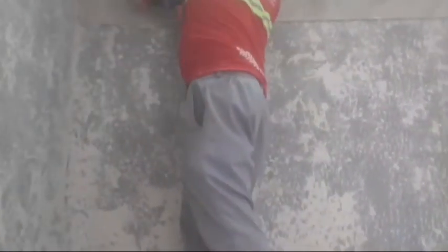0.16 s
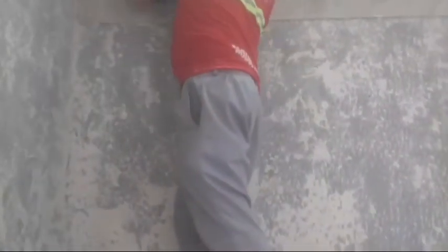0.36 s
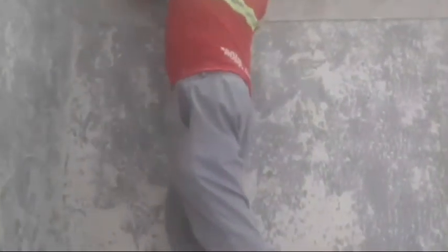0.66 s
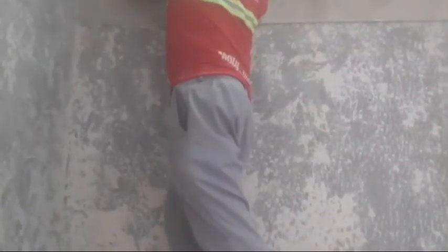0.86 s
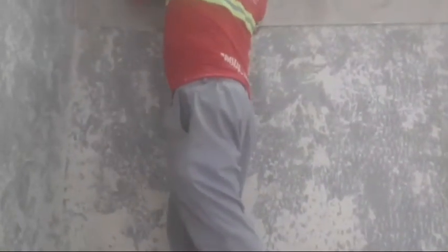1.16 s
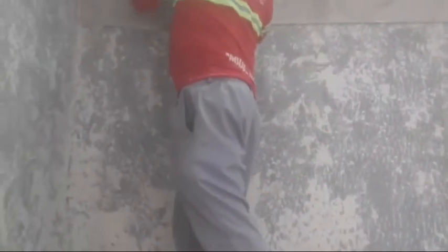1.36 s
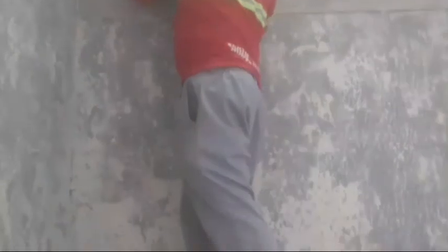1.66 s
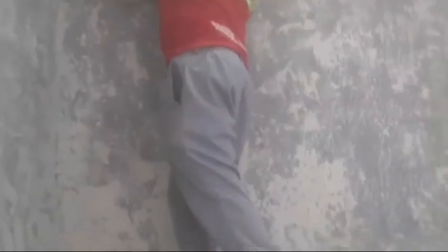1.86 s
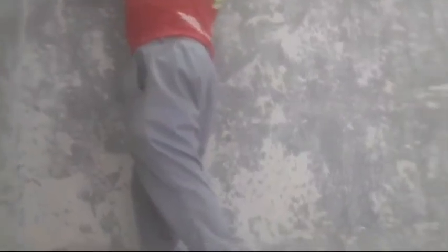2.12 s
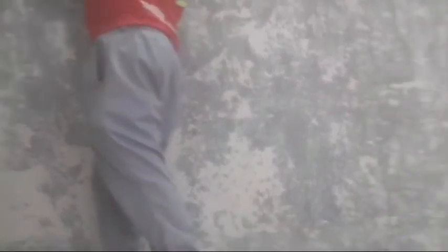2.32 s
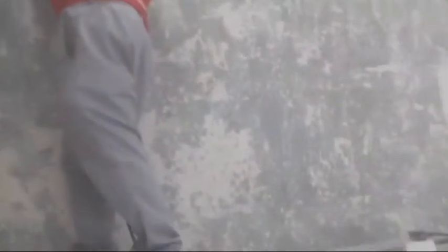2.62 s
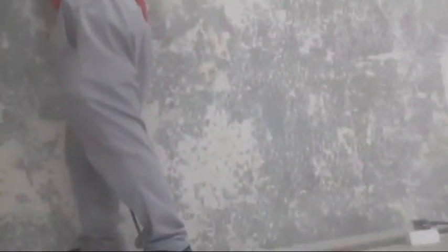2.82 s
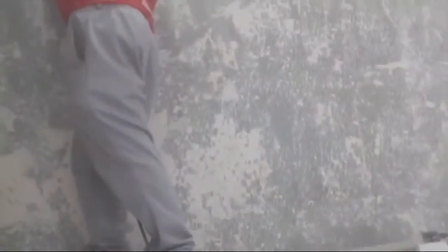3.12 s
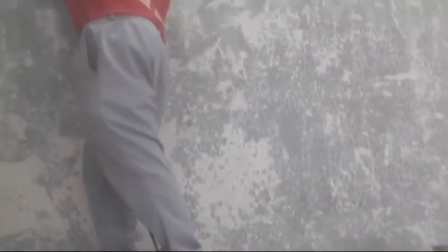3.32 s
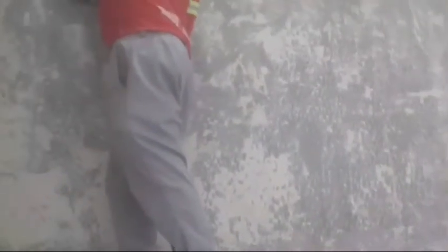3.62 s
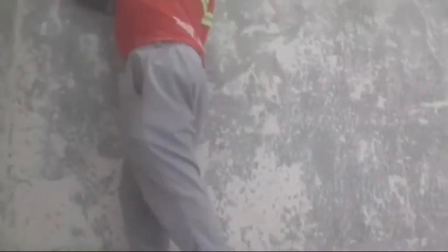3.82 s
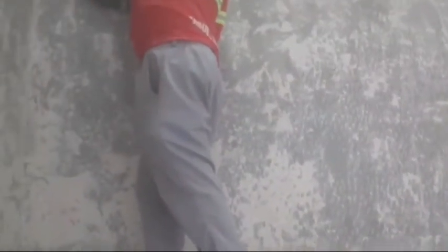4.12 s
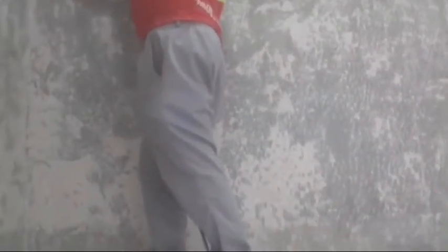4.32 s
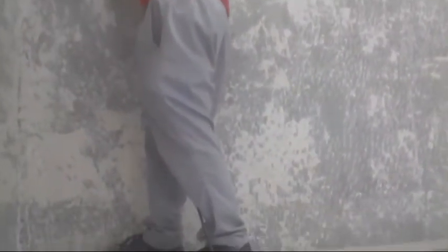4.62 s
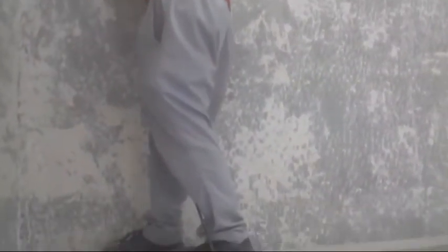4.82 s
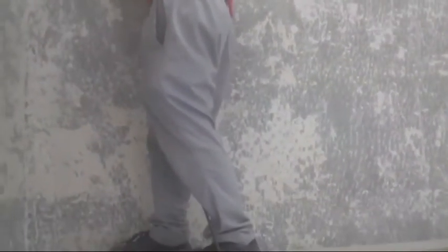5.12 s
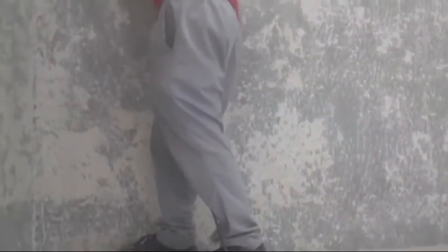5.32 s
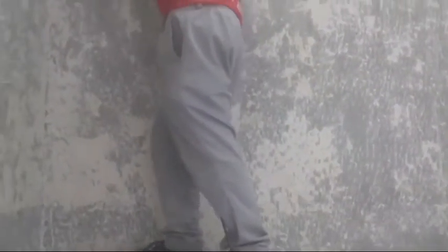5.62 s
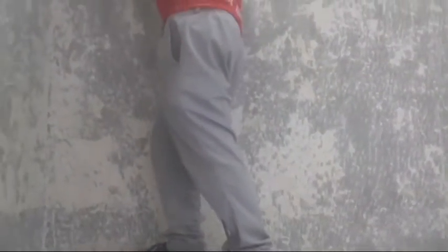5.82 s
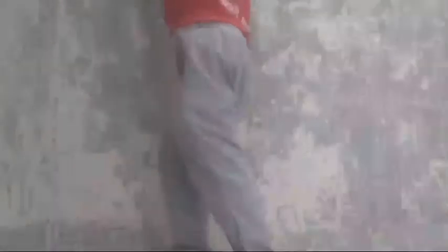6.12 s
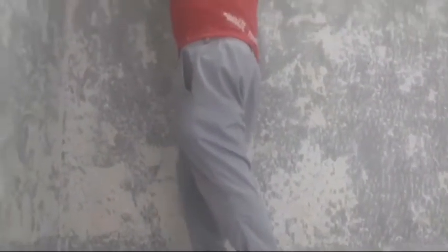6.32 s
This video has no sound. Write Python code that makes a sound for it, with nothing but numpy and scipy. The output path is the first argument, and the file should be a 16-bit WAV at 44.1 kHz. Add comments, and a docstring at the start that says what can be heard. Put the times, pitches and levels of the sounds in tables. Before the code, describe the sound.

At the start, the motor of an electric chipping hammer is coasting down with a rattle in a bare, echoing room. At about 0.6 seconds the trigger clicks, the motor whines up and the chisel pounds the wall in a loud, very fast buzz, cracking tile near 1 second. It cuts off at about 1.2 seconds, and the gears rattle and fall in pitch as they slow. Soft knocks come around 2.4 seconds. From 3 to 4.5 seconds, shoes scuff quietly on grit and a loose slab gives a few short, hollow scrapes. A sharp, bright clink with quick bounces comes at 4.6 seconds, a piece of tile drops and rings at 4.8, and a knock follows at 5.1. At 5.8 seconds the hammer starts again and chisels until the end, near 6.5 seconds. Distant machines hum faintly underneath.

```python
"""A bare, echoing room on a building site: an electric chipping hammer breaks tiles off the wall.
Its motor is coasting down at the start, then runs in two short bursts: it whines up, the chisel
strikes some 70 to 80 times a second, and the gears rattle as they slow. One crank times both
the blows and the rattle. In the pause the worker shifts his feet, a loose slab scrapes,
hard pieces and the tool clink, and a piece of tile drops. Distant machines hum underneath."""
import sys
import numpy as np
from scipy import signal
from scipy.fft import rfft, irfft
from scipy.io import wavfile
from scipy.ndimage import uniform_filter1d, minimum_filter1d

SR = 44100
rng = np.random.default_rng(int(sys.argv[2]) if len(sys.argv) > 2 else 0)


def dump(signal):
    """Clip the signal to [-1, 1] and save it as 16-bit WAV at the path in sys.argv[1]."""
    limited = np.clip(np.atleast_2d(signal).T, -1, 1)
    pcm = np.round(limited * 32767).astype(np.int16)
    wavfile.write(sys.argv[1], SR, pcm)


N = 285327
TIME = np.arange(N) / SR


def from_db(db):
    """Decibels to gain."""
    return 10 ** (np.asarray(db) / 20)


def rms_one(x):
    """Scale to rms 1."""
    return x / np.sqrt(np.mean(x ** 2) + 1e-20)


def energy_one(x):
    """Scale to energy 1."""
    return x / np.sqrt(np.sum(x ** 2) + 1e-20)


def at_hz(points, hz):
    """Read a table on a log-frequency axis."""
    f, value = np.transpose(points)
    return np.interp(np.log(np.maximum(hz, 1)), np.log(f), value)


def drift(rate_hz):
    """Random wander: straight lines between unit normal draws."""
    return np.interp(TIME * rate_hz, np.arange(N), rng.standard_normal(N))


def through(x, response):
    """Pass a sound through an impulse response."""
    return signal.fftconvolve(x, response)[:N]


def body(spectrum, bass_db=0, treble_db=0, size=4096):
    """Minimum-phase response of a heavily damped body with this spectrum; energy 1."""
    hz = np.arange(size // 2 + 1) * SR / size
    tilt_db = at_hz([(400, bass_db), (1500, 0), (2300, 0), (7000, treble_db)], hz)
    cepstrum = irfft(np.log(from_db(at_hz(spectrum, hz) + tilt_db)))
    cepstrum[1:size // 2] *= 2
    cepstrum[size // 2 + 1:] = 0
    return energy_one(irfft(np.exp(rfft(cepstrum))))


def ringing(modes, pitch=1):
    """Response of a struck object: decaying sines; energy 1."""
    t = TIME[:SR // 2]
    return energy_one(sum(from_db(db - 60 * t / t60_s) * np.sin(2 * np.pi * hz * pitch * t)
                          for hz, db, t60_s in modes))


def placed(start_s, db, sound):
    """Place a sound of energy 1; db is its level if spread over 0.1 s."""
    return from_db(db) * np.sqrt(SR / 10) * np.pad(sound, (max(round(start_s * SR), 0), N))[:N]


# Room decay. Each row: frequency in Hz, T60 in seconds.
ROOM_DECAY = [(100, 0.56), (500, 0.69), (2000, 0.37), (4000, 0.61), (8000, 0.44), (15000, .45)]
# First reflections. Each row: delay in seconds, level in dB re the direct sound.
WALL_ECHOES = [(.0078, -5), (0.0173, -13), (.0245, -16), (.0335, -12)]

def room(x, direct_db, build_s=0.0063, scatter_s=0.001):
    """Direct sound, reflections scattered by rough walls, and a dense tail decaying band by band."""
    t = TIME[:SR]
    white, hz = rfft(rng.standard_normal(SR)), np.arange(SR // 2 + 1)
    centres_hz = np.geomspace(100, 15000, 9)
    tail = 0
    for centre_hz, share in zip(centres_hz, np.eye(len(centres_hz))):
        band = irfft(white * at_hz(list(zip(centres_hz, share)), hz), SR)
        tail = tail + band * from_db(-60 * t / at_hz(ROOM_DECAY, centre_hz))
    tail = energy_one(tail * (1 - np.exp(-t / build_s)))
    early = signal.unit_impulse(SR)
    for delay_s, db in WALL_ECHOES:
        scattered = energy_one(rng.standard_normal(SR) * np.exp(-t / scatter_s))
        early = early + from_db(db) * np.roll(scattered, round(delay_s * SR))
    return through(x, energy_one(tail + from_db(direct_db) * early))


# Distant site noise. Each row: frequency in Hz, spectral density in dB.
WASH_SPECTRUM = [(25, -19.5), (60, -14.5), (88, -11.5), (115, 0), (175, 0.5), (230, -3), (310, 5.5),
                 (420, 0.5), (570, 1.5), (750, -1), (1300, -2.5), (2050, -6), (3300, -16), (4100, -11),
                 (5500, -41), (7000, -34), (15500, -41)]
# Machine tones. Each row: frequency in Hz, level in dB re the wash.
MACHINE_TONES = [(174, -15), (748, -13), (1674, -25), (2019, -13.5), (2885, -22), (4215, -24.5)]
# Background level: the recorder's gain ducks after loud sounds, then slowly recovers.
# Each row: time in seconds, level in dB.
BACKGROUND_LEVEL = [(0, -55), (2.2, -57.5), (2.8, -48.5), (3.6, -47), (4.5, -48), (4.75, -50), (5.3, -49.5),
                    (5.6, -55.5), (6.47, -48.5)]

def site():
    """The dull wash of the site and the hum of distant machines, under one preset gain curve."""
    level_db = np.interp(TIME, *np.transpose(BACKGROUND_LEVEL))
    wash = through(rng.standard_normal(N), body(WASH_SPECTRUM))
    hum = 0
    for hz, db in MACHINE_TONES:
        amplitude = np.sqrt(2) * from_db(db + 2 * drift(3.8))
        hum = hum + amplitude * np.sin(2 * np.pi * hz * TIME + 0.78 * drift(11))
    return from_db(level_db) * (wash + hum)


# Microphone bump. Each row: start in seconds, level in dB.
MIC_BUMPS = [(4.216, -56)]

def bump():
    """A soft bump on the microphone rings two low modes."""
    thud = ringing([(75, -10, .04), (138, -1, .03)])
    return sum(placed(s, db, thud) for s, db in MIC_BUMPS)


# Slab scrapes. Each row: start in seconds, level in dB, decay time in seconds.
SLAB_SCRAPES = [(3.365, -43.5, 0.022), (3.472, -42, 0.028), (3.55, -43.5, .05), (3.862, -47.5, 0.016)]
# Slab modes. Each row: frequency in Hz, level in dB, T60 in seconds.
SLAB_MODES = [(660, 0, 0.064), (840, 3, .04), (1153, -2, 0.032), (1390, 1, 0.0205)]

def scrapes():
    """Grit under a sliding slab keeps its hollow modes ringing."""
    t, out = TIME[:SR // 2], 0
    for s, db, decay_s in SLAB_SCRAPES:
        grit = rng.standard_normal(len(t)) * np.exp(-t / decay_s)
        out = out + placed(s, db, energy_one(through(grit, ringing(SLAB_MODES))))
    return room(out, direct_db=-3)


# Struck rubble. Each row: frequency in Hz, spectral density in dB.
RUBBLE_SPECTRUM = [(60, -32), (160, -22), (300, -6), (420, -8), (750, -3), (1100, 0), (1600, 1.5),
                   (2100, 5), (3100, -5), (4100, -3), (5200, -14.5), (7000, -34), (11000, -45.5),
                   (15500, -54)]

def contact(decay_s, bass_db, treble_db, grit_db=-1, grain_db=3.5):
    """A gritty crunch on mortar; only a short contact starts with a click. Energy 1."""
    t = TIME[:SR // 4]
    grit = rng.standard_normal(len(t)) * from_db(grain_db * rng.standard_normal(len(t)))
    fade = np.exp(-t / decay_s)
    force = from_db(grit_db) * grit * fade * (1 - 0.68 * fade)
    force[0] += 14 * np.exp(-decay_s / 0.0018)
    return energy_one(through(force, body(RUBBLE_SPECTRUM, bass_db, treble_db)))


# Shoe scuffs. Each row: start in seconds, level in dB.
SHOE_SCUFFS = [(3.1, -51), (3.135, -49), (3.309, -37.5), (3.652, -50), (4.057, -52), (4.546, -41)]

def scuffs():
    """Shoes scuff on the gritty floor."""
    return sum(placed(s, db, contact(decay_s=.013, bass_db=9, treble_db=9)) for s, db in SHOE_SCUFFS)


def knock(weight_db, doubling_db=16):
    """One impact: the heavier the lump, the deeper, duller and longer the contact."""
    decay_s = .0024 * 2 ** (weight_db / doubling_db)
    return contact(decay_s, bass_db=weight_db, treble_db=-9 - .5 * weight_db)


# Knocks and rebounds. Each row: start in seconds, level in dB, weight as bass gain in dB.
KNOCKS_AND_REBOUNDS = [(.545, -41.5, -5), (.667, -30, -7), (2.376, -37.5, 7), (2.453, -41.5, 9),
                       (2.703, -44.5, -7), (3.361, -41, 7), (3.473, -46, 3), (3.796, -49, 4),
                       (3.867, -50, 10), (4.63, -22, -20), (4.645, -23.5, -9), (4.662, -24, -6),
                       (5.139, -26.5, 0), (5.327, -41, 5)]

def knocks():
    """Knocks of rubble and tool; the loudest is followed by two quick echoes or bounces."""
    return sum(placed(s, db, knock(weight_db)) for s, db, weight_db in KNOCKS_AND_REBOUNDS)


# Clinks of hard pieces and the tool. Each row: start in seconds, level in dB, pitch in Hz.
HARD_CLINKS = [(3.474, -59, 5230), (3.491, -63, 5700), (3.79, -67, 5250), (4.026, -61.5, 5250),
               (4.057, -64, 5700), (4.368, -59.5, 5250), (4.373, -65, 5760), (4.555, -41, 5920),
               (4.6288, -35.5, 4140), (4.634, -21, 5190), (5.1074, -53.5, 4990), (5.1384, -38, 4140)]
# Clink modes. Each row: multiple of the pitch, level in dB, T60 in seconds.
CLINK_MODES = [(1, -2, .03), (1.012, 6.5, 0.05), (1.075, -20.5, .05), (1.095, -10.5, .16),
               (1.8, -22, 0.026), (2.2, -24, 0.025)]
# A piece of tile lands on its edge. Each row: start in seconds, level in dB.
TILE_LANDINGS = [(4.8448, -23.5)]
# Its modes. Each row: frequency in Hz, level in dB, T60 in seconds.
TILE_MODES = [(3125, -7, 0.13), (3530, -1, 0.12), (3720, 1, .02), (3970, 10, 0.019), (4040, -14, .025),
              (4960, -2, 0.033), (5520, -1, 0.025), (6520, -15, 0.056), (9300, -14, .02), (13160, -26, .06)]

def clinks(band_hz=(1200, 11500)):
    """Short, bright clinks of hard pieces and the tool, each at its own pitch; a dropped tile rings."""
    bright = sum(placed(s, db, ringing(CLINK_MODES, hz)) for s, db, hz in HARD_CLINKS)
    tile = sum(placed(s, db, ringing(TILE_MODES)) for s, db in TILE_LANDINGS)
    heard = room(bright, direct_db=2.5) + room(tile, direct_db=4)
    # Small objects radiate no bass; the contact is too soft for the very top.
    return signal.sosfilt(signal.butter(2, band_hz, "band", fs=SR, output="sos"), heard)


def ticks(crumb_count=4, span_s=(3.7, 4.55), crumb_db=-59, spread_db=3, edge_db=-11):
    """Hard, bright ticks on the floor: mortar crumbs at random, and the landing tile's edge."""
    crumbs = [(rng.uniform(*span_s), rng.normal(crumb_db, spread_db)) for _ in range(crumb_count)]
    edges = [(s, db + edge_db) for s, db in TILE_LANDINGS]
    return sum(placed(s, db, contact(decay_s=.0015, bass_db=-12, treble_db=21))
               for s, db in crumbs + edges)


def crank(on_s, off_s, top_hz, sag_hz_per_s, spin_up_s=.06, coast_s=.8, friction_hz_per_s=9):
    """Turns per second: the motor spins up, sags under load, then fan and dry friction slow it."""
    run_s = np.maximum(np.minimum(TIME, off_s) - on_s, 0)
    driven_hz = top_hz * (1 - np.exp(-run_s / spin_up_s)) - sag_hz_per_s * run_s
    friction_hz = friction_hz_per_s * coast_s
    fan_decay = np.exp(-np.maximum(TIME - off_s, 0) / coast_s)
    return np.maximum((driven_hz + friction_hz) * fan_decay - friction_hz, .01)


# Trigger pulls. Each row: on and off in seconds, top crank speed in Hz, sag under load in Hz/s,
# time to press the chisel home in seconds, base blow level in dB, base rattle level in dB.
TRIGGER_PULLS = [(-1.5, -.75, 77, 0, .1, -90, -18.4), (.626, 1.17, 85, 17, .14, -11.9, -17.8),
                 (5.82, 6.43, 72.3, 0, .06, -13, -21.8)]

def drive(waver_depth=.009, loose_db=-20, striker_fade_db_per_s=130, gear_hz=28.5, gear_width_hz=7):
    """Each pull sets the crank speed, and with it the levels of blows, rattle and whine."""
    controls, waver = np.zeros((4, N)), 1 + waver_depth * drift(18)
    for on_s, off_s, top_hz, sag_hz_per_s, press_s, base_blow_db, base_rattle_db in TRIGGER_PULLS:
        speed_hz = crank(on_s, off_s, top_hz, sag_hz_per_s) * waver
        decades, powered = np.log10(speed_hz / top_hz), TIME < off_s
        torque = powered * (1 - speed_hz / top_hz)
        # Hard blows need speed, the chisel pressed home and the trigger held.
        loose = np.clip(1 - (TIME - on_s) / press_s, 0, 1)
        release_db = striker_fade_db_per_s * np.maximum(TIME - off_s, 0)
        blow_db = base_blow_db + 20 * decades + loose_db * loose - release_db
        rattle_db = base_rattle_db + 26 * decades + 3.3 * powered + 2.5 * torque
        # Coasting, the slack gears resonate as the speed passes gear_hz.
        slack_db = 10.5 * np.exp(-((speed_hz - gear_hz) / gear_width_hz) ** 2)
        whine_re_rattle_db = -15 + np.where(powered, 8.5 + 4 * torque, slack_db)
        controls = np.where(TIME >= on_s, [speed_hz, blow_db, rattle_db, whine_re_rattle_db], controls)
    return controls


def switch(level_db=-43.5):
    """The trigger switch clicks as it closes."""
    return sum(placed(on_s, level_db, knock(weight_db=0)) for on_s, *_ in TRIGGER_PULLS if on_s > 0)


# Motor housing. Each row: frequency in Hz, spectral density in dB.
HOUSING_SPECTRUM = [(60, -47), (200, -19.5), (480, -13.5), (830, -3), (1150, -1.5), (1700, 3.5),
                    (2150, 2.5), (3000, -9), (3700, -6), (4080, -2), (4400, -9.5), (5400, -24.5),
                    (8200, -36.5), (15000, -59.5)]

def motor(turns, rattle_db, whine_re_rattle_db, teeth_per_turn=32, depth_db=5, grain_db=2):
    """Fan and gears rattle the housing once per crank turn; the meshing teeth make it whine."""
    swell = rms_one(from_db(depth_db * np.cos(2 * np.pi * turns) + grain_db * drift(500)))
    rattle = from_db(rattle_db) * swell * rng.standard_normal(N)
    mesh_rad = 2 * np.pi * teeth_per_turn * turns + .4 * drift(120)
    teeth = .5 * (np.sin(mesh_rad) + from_db(-3) * np.sin(2 * mesh_rad)) * swell
    whine = from_db(rattle_db + whine_re_rattle_db) * teeth
    housing = body(HOUSING_SPECTRUM)
    return room(through(rattle, housing), direct_db=-5.5) + room(through(whine, housing), direct_db=.5)


# Tiles give way. Each row: time in seconds, glaze crack in dB, dip of the thump in dB.
TILE_BREAKS = [(.98, -21, 7), (6.32, -32, 1.5)]

def breaking(blow_db, hard_blow_db=-16, build_db_per_s=34, fall_db_per_s=85):
    """Cracking builds to each break and dies away; the thump dips with it. Weak blows crack little."""
    crack, dip_db = 1e-9, 0
    for s, db, give_db in TILE_BREAKS:
        since_s = TIME - s
        giving = from_db(np.minimum(build_db_per_s * since_s, -fall_db_per_s * since_s))
        crack = crack + from_db(db) * giving
        dip_db = dip_db + give_db * giving
    return blow_db - dip_db, 20 * np.log10(crack) + np.minimum(blow_db - hard_blow_db, 0)


def blows(turns, speed_hz, jitter_s, uneven_db=1.3):
    """One click per crank turn, each a little off in time and strength; rms near 1."""
    at = np.flatnonzero(np.diff(np.floor(turns)))
    timing, strength = rng.standard_normal((len(at), 2)).T
    late = np.round(timing * jitter_s[at] * SR).astype(int)
    clicks = np.zeros(N)
    clicks[np.clip(at + late, 0, N - 1)] = from_db(uneven_db * strength) * np.sqrt(SR / speed_hz[at])
    return clicks


def crunch(clicks, decay_s):
    """Every click crushes grit: a fresh puff of noise of the same energy."""
    envelope = through(clicks, energy_one(np.exp(-TIME[:SR // 10] / decay_s)))
    return envelope * rng.standard_normal(N)


# Struck wall and cracking glaze. Each row: frequency in Hz, spectral density in dB.
WALL_SPECTRUM = [(40, -55), (80, -31), (140, -21.5), (240, -16), (288, -7), (390, -8.5), (650, -5),
                 (1100, -3), (2000, 2.5), (3000, -9), (4000, -3.5), (5000, -17.5), (7500, -30),
                 (15500, -40.5)]
GLAZE_SPECTRUM = [(500, -19.5), (2500, 0), (4500, 10), (7000, -2.5), (9000, -15), (15500, -17)]
# Steel chisel. Each row: frequency in Hz, level in dB, T60 in seconds.
CHISEL_MODES = [(6100, -4, 0.02), (6600, -3, 0.0087), (9850, 1, 0.013), (13400, -3, 0.048),
                (13550, -2, .015), (13850, 2, 0.022), (14100, -8, .012)]
# The chisel jumps free and rings. Each row: start in seconds, level in dB.
CHISEL_JUMPS = [(1.0, -41), (1.075, -37), (1.15, -41), (1.185, -31.5)]

def hammer(turns, speed_hz, blow_db, grit_db=-6.5, steel_db=-30.5,
           boom_db=-18, boom_hz=289, boom_width_hz=14):
    """Each blow thumps the wall, cracks the glaze and rings the steel chisel."""
    thump_db, crack_db = breaking(blow_db)
    skip_s = 5e-5 * (blow_db - thump_db)  # the chisel skips on a loosening tile
    clicks = blows(turns, speed_hz, jitter_s=4e-5 + skip_s)
    force = clicks + from_db(grit_db) * crunch(clicks, decay_s=.002)
    thump = through(force * from_db(thump_db), body(WALL_SPECTRUM))
    crack = through(crunch(clicks, decay_s=.0013) * from_db(crack_db), body(GLAZE_SPECTRUM))
    chisel = ringing(CHISEL_MODES)
    steel = through(crunch(clicks, decay_s=.0006) * from_db(thump_db + steel_db), chisel)
    steel += sum(placed(s, db, chisel) for s, db in CHISEL_JUMPS)
    # The wall booms when the fourth harmonic of the blows meets its resonance.
    detuning = (4 * speed_hz - boom_hz) / boom_width_hz
    boom = from_db(thump_db + boom_db) * np.sin(2 * np.pi * 4 * turns) / np.hypot(1, detuning)
    return room(thump, direct_db=-9) + room(crack, direct_db=4) + room(steel, direct_db=2) + boom


def scene():
    """One crank drives motor noise and blows, over the debris and the distant site; mono."""
    speed_hz, blow_db, rattle_db, whine_re_rattle_db = drive()
    turns = np.cumsum(speed_hz) / SR
    tool = hammer(turns, speed_hz, blow_db) + motor(turns, rattle_db, whine_re_rattle_db)
    contacts = room(knocks() + switch() + scuffs() + ticks(), direct_db=-4.5)
    return (tool + contacts + scrapes() + clinks() + site() + bump())[None]


def record(dry, bass_cut_hz=55, top_cut_hz=15700, ceiling=0.77, window_samples=65):
    """The small microphone loses deep bass, a fast limiter holds the peaks, and the top is cut."""
    thin = signal.sosfilt(signal.butter(2, bass_cut_hz, "high", fs=SR, output="sos"), dry)
    allowed = ceiling / np.maximum(np.abs(thin), ceiling)
    gain = uniform_filter1d(minimum_filter1d(allowed, window_samples), window_samples)
    return signal.sosfilt(signal.ellip(10, .2, 80, top_cut_hz, fs=SR, output="sos"), thin * gain)


dry = scene()
out = record(dry)
dump(out)
```